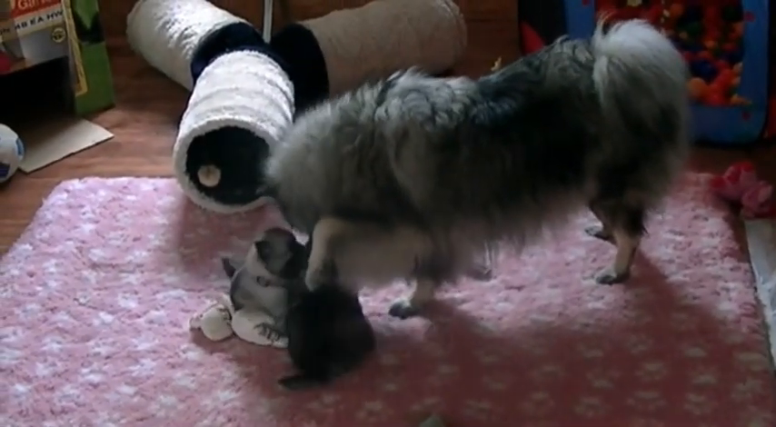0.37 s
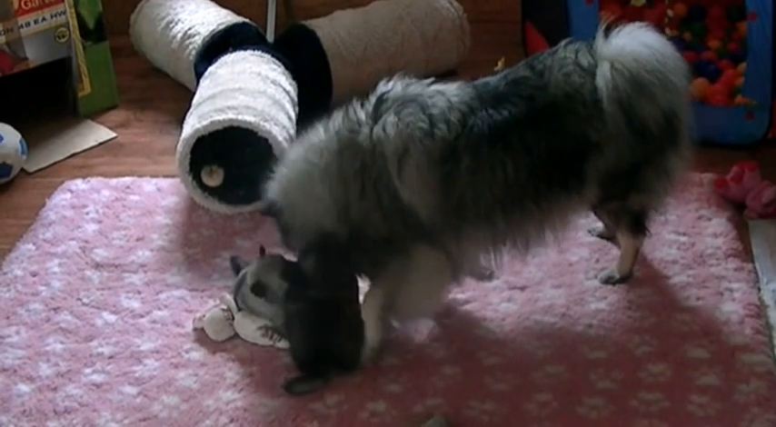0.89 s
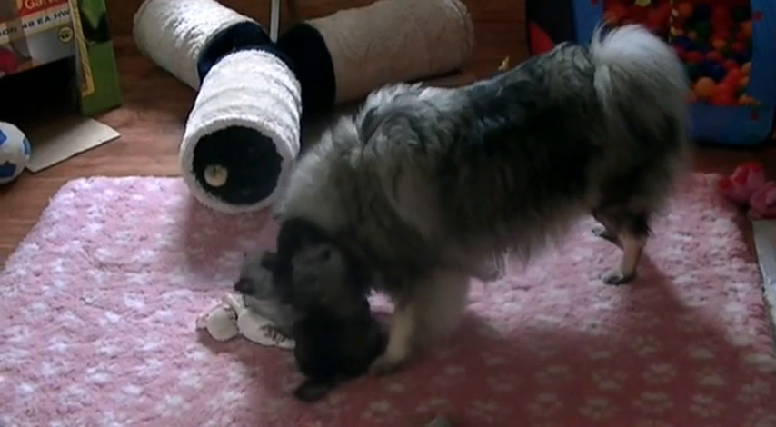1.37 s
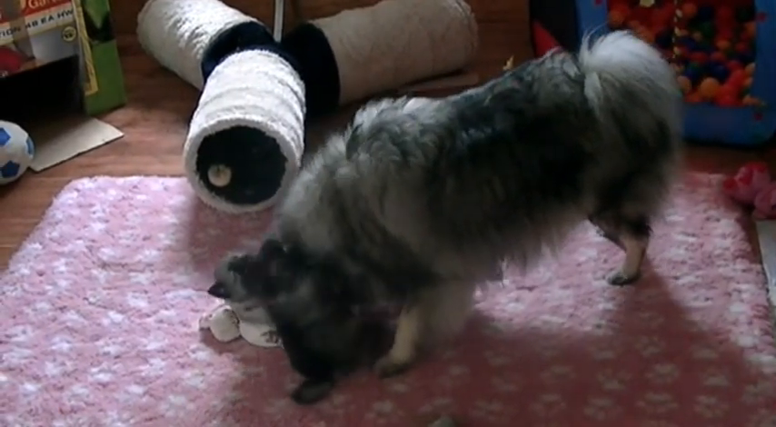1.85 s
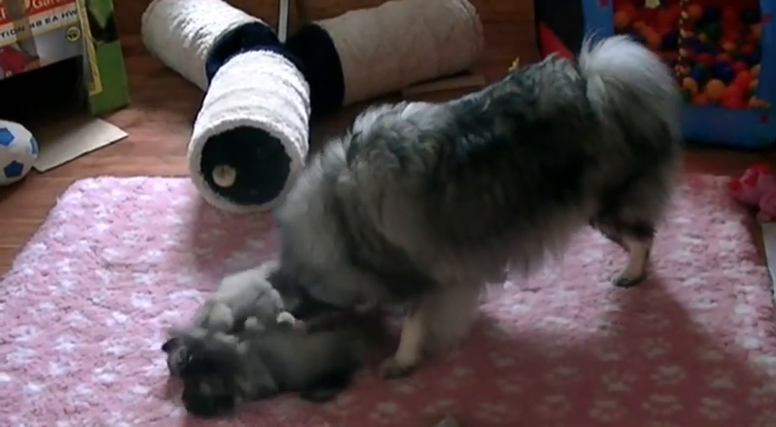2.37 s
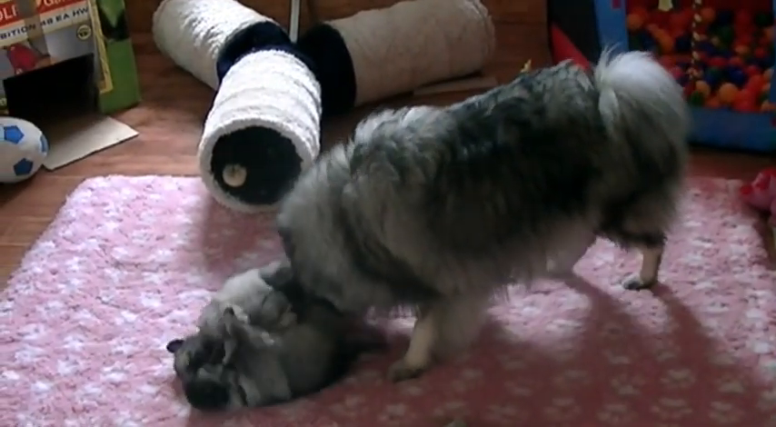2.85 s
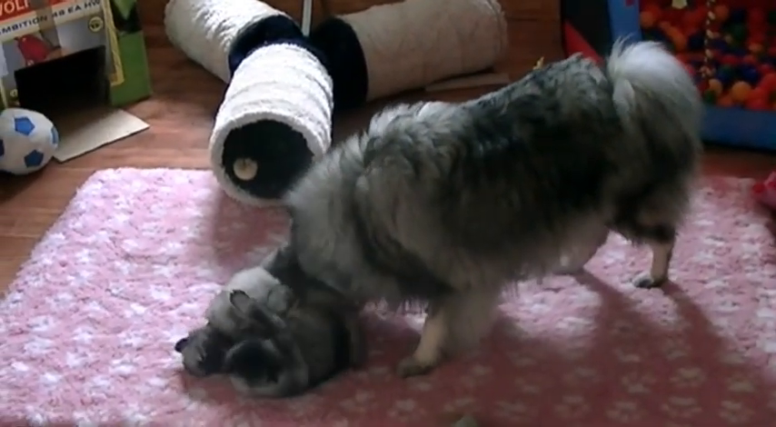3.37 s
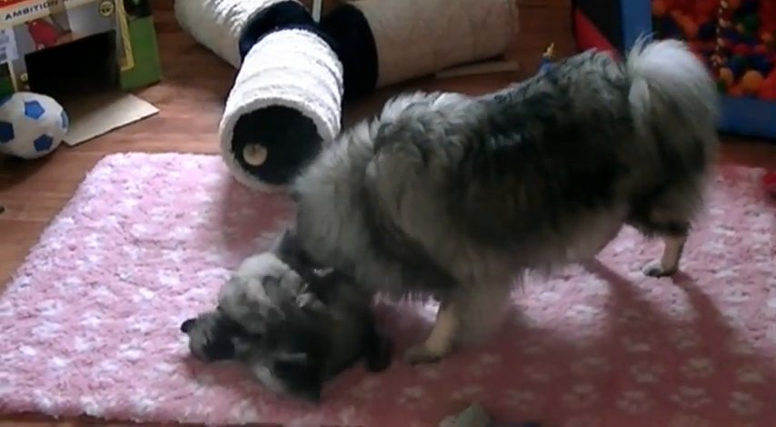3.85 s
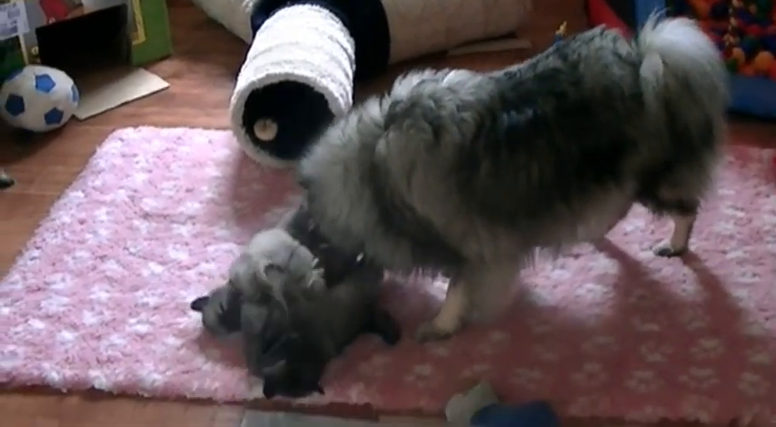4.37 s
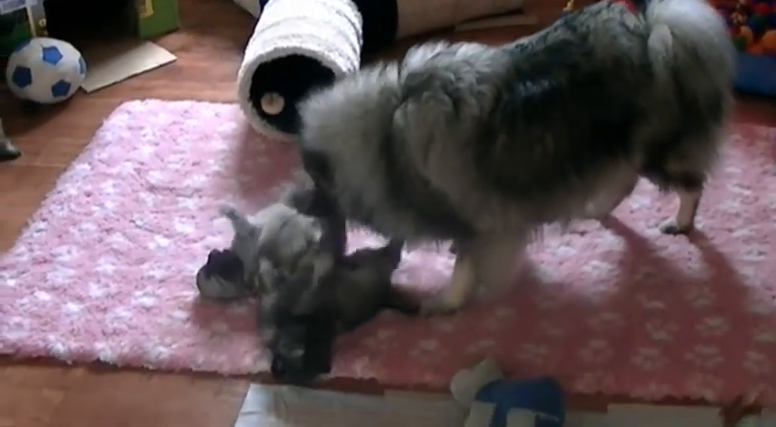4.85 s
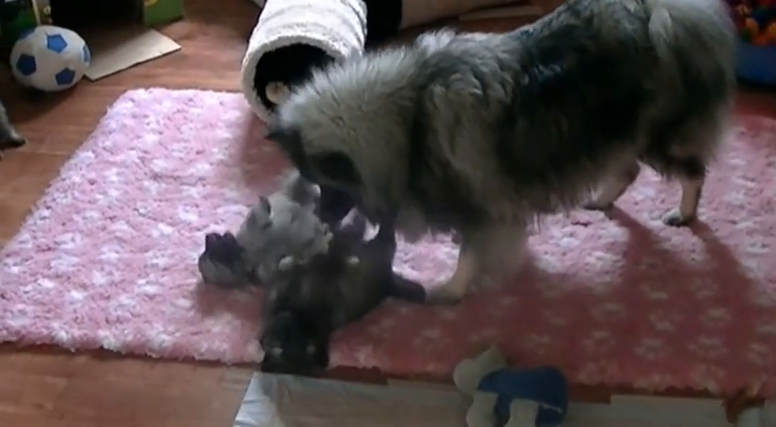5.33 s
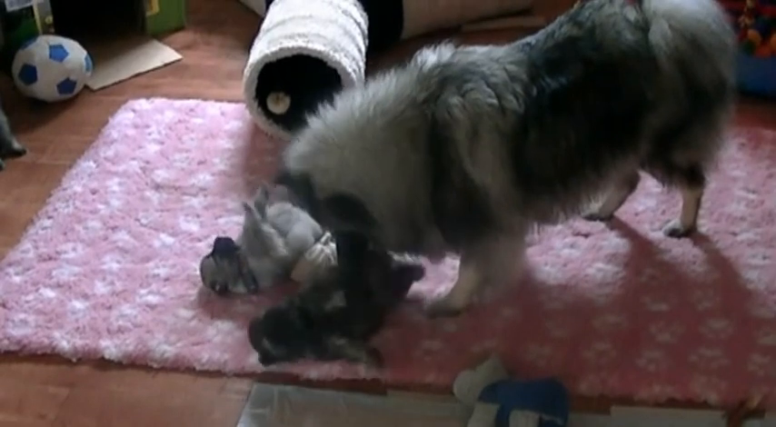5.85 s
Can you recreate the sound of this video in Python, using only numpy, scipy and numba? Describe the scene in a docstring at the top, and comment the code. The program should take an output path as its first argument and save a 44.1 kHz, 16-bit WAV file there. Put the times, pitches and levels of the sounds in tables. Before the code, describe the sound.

Puppies wrestle on a blanket in a lightly echoing living room. Tiny hoarse whimpers and whines come irregularly over soft hiss, low rumble, fur rustle, claw ticks and paw scuffs. A bigger dog grunts briefly and quietly. After about four seconds, five loud shrill squeals follow one another, each rising and falling, the second the most piercing. One microphone in the room, mono; the background dips after loud cries.

```python
"""Puppies wrestling on a blanket

In a living room, puppies give soft whimpers and whines, then five loud squeals; a bigger dog grunts.
Each cry stacks overtones on a gliding pitch, adds breath noise, and rings on in the room.
Shaped noise makes the hiss, rumble, rustling fur, ticking claws and scuffing paws; bumps are fading swings.
A limiter holds the peaks, and a gain control turns loud moments down and lets the level creep back."""
import sys
import numpy as np
from scipy import signal
from scipy.fft import rfft, irfft, next_fast_len
from scipy.io import wavfile
from scipy.ndimage import uniform_filter1d, minimum_filter1d, map_coordinates
from numba import njit

SR = 44100
rng = np.random.default_rng(int(sys.argv[2]) if len(sys.argv) > 2 else 0)


def volts_from_decibels(level):
    """Turn decibel levels (scalar or array-like) into linear amplitude factors."""
    exponent = np.asarray(level, float) / 20
    return 10 ** exponent


def output_pcm(signal):
    """Save a mono or channel-first signal as 16-bit PCM at the path in sys.argv[1].

    Samples are clipped to [-1, 1] before scaling.
    """
    pcm = np.clip(np.atleast_2d(signal).T, -1, 1) * 32767
    wavfile.write(sys.argv[1], SR, np.round(pcm).astype(np.int16))


N = 263277  # length of the scene in samples

# Tone colour of rubbing fur, also of the burst that opens a cry: (frequency [Hz], relative level [dB])
RUSTLE_COLOUR = [(300, -35), (1500, 13), (5000, -2.5), (10000, -5.5), (16000, -24)]


def unit(x):
    """Scales a sound to rms 1."""
    return x / np.sqrt(np.mean(x ** 2) + 1e-20)


def along(points, hz):
    """Reads a (frequency [Hz], value) table, with straight lines on a log frequency axis."""
    f, v = np.transpose(points)
    return np.interp(np.log(hz + 1), np.log(f + 1), v)


def noise(spectrum, size):
    """Noise of rms 1, coloured by filtering white noise with the spectrum."""
    m = next_fast_len(size + 2048)
    colour = volts_from_decibels(along(spectrum, np.fft.rfftfreq(m, 1 / SR)))
    white = rng.standard_normal(m)
    return unit(irfft(rfft(white) * colour, m)[:size])


def wobble(rate, size):
    """A smooth random curve through a given rate of random points a second."""
    points = rng.standard_normal(int(size * rate / SR) + 4)
    return map_coordinates(points, [np.arange(size) * rate / SR])


def room(x, wet_db):
    """Adds to the direct sound a fresh random tail of echoes; each frequency dies at its own speed."""
    # How long the room rings: (frequency [Hz], time to fall by 60 dB [s])
    ring_times = [(300, 0.52), (1300, 0.54), (3500, 0.36), (8000, 0.37), (14000, 0.059)]
    hz, t, z = signal.stft(rng.standard_normal(SR * 3 // 4), SR, nperseg=256)
    fading = z * volts_from_decibels(-60 * t / along(ring_times, hz)[:, None])
    tail = signal.istft(fading, SR, nperseg=256)[1]
    tail *= 1 - np.exp(-np.arange(len(tail)) / (0.00043 * SR))  # the echoes take a moment to gather
    tail *= volts_from_decibels(wet_db) / np.linalg.norm(tail)
    tail[0] = 1  # the direct sound
    return signal.fftconvolve(x, tail)


def add(track, s, sound):
    """Mixes a sound into the track at a time in seconds."""
    part = track[round(s * SR):][:len(sound)]
    part += sound[:len(part)]


def hiss():
    """Steady coloured noise whose level wavers slowly."""
    # Tone colour of the hiss: (frequency [Hz], relative level [dB])
    hiss_colour = [(15, -56), (25, -37), (148, -6.5), (423, -3.5), (585, -8), (950, -7), (1350, -11.5),
                   (2080, -14), (4180, -17.5), (4790, -17), (15700, -26.5)]
    return volts_from_decibels(-52.5 + 0.97 * wobble(5.34, N)) * noise(hiss_colour, N)


def rumble():
    """Lumpy low noise that grows stronger or weaker during some bouts."""
    # Tone colour of the rumble: (frequency [Hz], relative level [dB])
    rumble_colour = [(20, -23), (45, -35), (70, -5.5), (130, -7.5), (300, -9), (600, -25), (1000, -69)]
    # When the rumble changes: (start [s], length [s], level change [dB])
    bouts = [(2.297, .5, 5), (3.2, .95, 7), (4.498, 1, -1), (5.25, 0.89, 9.5)]
    calm_db, swell_s = -67, 0.053
    t = np.arange(N) / SR
    rumble_db = np.full(N, float(calm_db))
    for s, length, change_db in bouts:
        to_edge = np.minimum(t - s, s + length - t)
        rumble_db += change_db * np.clip(to_edge / swell_s, 0, 1)
    return volts_from_decibels(rumble_db + 4.1 * wobble(25, N)) * noise(rumble_colour, N)


def fur_rustle():
    """Fur rubbing on the blanket: noise that follows a drawn level, wavering a little."""
    # Strength of the rubbing: (time [s], level [dB])
    rubbing = [(0, -98), (1.2, -60), (2.0, -56), (2.6, -65.5), (4.2, -61)]
    level_db = np.interp(np.arange(N) / SR, *np.transpose(rubbing))
    return volts_from_decibels(level_db + 0.38 * wobble(30, N)) * noise(RUSTLE_COLOUR, N)


def paw_scuffs():
    """Paws and fur scuffing the blanket: short uneven swells of noise around one frequency."""
    # Scuffs: (start [s], level [dB], length [s], brightness [Hz])
    scuffs = [(1.254, -54, 0.21, 5530), (2.265, -52.5, 0.064, 2700), (3.487, -58.5, 0.07, 1450),
              (3.993, -53.5, 0.062, 880), (4.317, -56.5, 0.048, 5030)]
    out = np.zeros(N)
    for s, db, length, hz in scuffs:
        size = round(length * SR)
        band = [(hz / 5, -40), (hz / 1.5, 0), (hz * 1.5, 0), (hz * 5, -40)]
        swell = volts_from_decibels(db + 1.6 * wobble(93, size)) * np.hanning(size) ** 0.28
        add(out, s, swell * noise(band, size))
    return out


def thumps():
    """Dull thumps: one quick push, then a slower and slower rebound that fades."""
    # Bumps: (time [s], level before the onset and fade [dB])
    bumps = [(3.2146, -30), (4.414, -31), (5.293, -30.5)]
    out, t = np.zeros(N), np.arange(SR // 20) / SR
    for s, db in bumps:
        swing = np.sin(2 * np.pi * np.sqrt(t / 0.0084))  # the root stretches each later swing
        fade = volts_from_decibels(-60 * t / 0.014)
        onset = 1 - np.exp(-t / 0.00021)
        add(out, s, volts_from_decibels(db) * swing * fade * onset)
    return out


def claw_ticks():
    """Claws tick: a bright crack of noise that dies in milliseconds, with echoes."""
    # Ticks: (time [s], strength relative to each other [dB])
    ticks = [(1.85, -29), (1.9974, -21.5), (2.6973, -35), (3.7368, -32), (4.305, -30), (4.323, -36),
             (4.332, -31), (4.42, -30.5)]
    # Tone colour of a claw: (frequency [Hz], relative level [dB])
    claw_colour = [(1500, -30), (5000, -7), (10000, -1), (13500, -15), (16000, -28)]
    out, t = np.zeros(N), np.arange(SR // 20) / SR
    for s, db in ticks:
        crack = noise(claw_colour, len(t)) * volts_from_decibels(-60 * t / 0.0064)
        add(out, s, room(volts_from_decibels(db - 11.0) * crack, wet_db=-6))
    return out


def coloured(rows, octave_db, sinks=0.53):
    """Adds the octave's level: it opens with the mouth and lags behind the swell of the fundamental."""
    s, hz, db, mouth_db = np.transpose(rows)
    # sinks: dB of octave lost per dB of effort gained
    octave = octave_db + 0.45 * mouth_db - sinks * (db - db.max())
    return np.transpose([s, hz, db, octave, mouth_db])


def short(s, length, first_hz, last_hz, db, mouth_db):
    """A short cry: swells, fades, glides to its last pitch; the mouth narrows at the peak."""
    share = np.linspace(0, 1, num=21)  # share of the cry's length
    fall = np.interp(share, [0, 0.65, 1], [-9.5, 0, -28.5])  # dB under the peak
    hz = first_hz + (last_hz - first_hz) * np.clip(share / 0.33, 0, 1)
    return np.transpose([s + length * share, hz, db + fall, mouth_db - 0.77 * fall])


def cry(rows, jitter, breath_db, shrill_db=0):
    """Vocal folds at a gliding pitch: overtones coloured by the throat, and air leaking past."""
    # Throat colour, from the third harmonic up: (frequency [Hz], relative level [dB])
    throat = [(2000, 10.5), (3300, -13), (4000, -10.5), (4700, -6), (5500, -3), (6300, -16), (7000, -29.5),
              (8000, -22), (10500, -43.5), (12800, -50.5), (15000, -48.5)]
    # Tone colour of the leaking air: (frequency [Hz], relative level [dB])
    breath_colour = [(700, -16.5), (2000, -3.5), (3500, -18), (4600, -9.5), (5600, 3), (6800, -12),
                     (9000, -8.5), (16000, -62)]
    s, *cols = np.transpose(rows)
    t = np.arange(s[0], s[-1], 1 / SR)
    curves = [uniform_filter1d(np.interp(t, s, c), 350, mode="nearest") for c in cols]
    hz, db, octave_db, upper_db = curves
    unsteady_hz = hz * (1 + jitter * wobble(298.6, len(t)))  # smears the high overtones most
    phase = 2 * np.pi * np.cumsum(unsteady_hz) / SR
    octave = volts_from_decibels(octave_db + 3 * wobble(45, len(t))) * np.sin(2 * phase + 1)
    voice = np.sin(phase) + octave
    for k in range(3, 12):
        shimmer = 0.8 * min(k, 5) * wobble(50, len(t))
        level_db = upper_db + along(throat, k * hz) + shimmer + shrill_db * (k >= 4)
        voice += volts_from_decibels(level_db) * np.sin(k * phase + k * k)
    air_db = breath_db + 0.29 * (upper_db - upper_db.max())
    air = volts_from_decibels(air_db) * noise(breath_colour, len(t)) * (1 + np.cos(phase))  # a puff each cycle
    pop_db = db.max() + breath_db + 5.0 - 60 * (t - s[0]) / 0.037
    pop = volts_from_decibels(pop_db) * noise(RUSTLE_COLOUR, len(t))  # the folds burst open
    edges = np.clip(np.minimum((t - s[0]) / 0.0038, (s[-1] - t) / 0.0022), 0, 1)
    return edges * (volts_from_decibels(db) * (voice + air) + pop)


def soft_cry(rows, hoarse):
    """A soft cry with its own echoes; hoarse folds shake more and leak more air."""
    voice = cry(rows, jitter=0.03 * hoarse ** 1.5, breath_db=-26.5 + 8.4 * hoarse)
    return room(voice, wet_db=-4.0)


def big_dog_grunts():
    """A bigger dog's folds swing slowly and unsteadily, giving short low cries."""
    # Grunts: (start [s], length [s], first pitch [Hz], last pitch [Hz], peak of the fundamental [dB])
    grunts = [(3.544, 0.028, 397, 372, -43), (3.746, 0.053, 380, 355, -47),
              (5.795, 0.087, 350, 316.6, -33.5)]
    out = np.zeros(N)
    for row in grunts:
        rows = coloured(short(*row, mouth_db=-30.5), octave_db=-3.5)
        add(out, row[0], room(cry(rows, jitter=0.037, breath_db=-42), wet_db=-12.5))
    return out


def whimpers():
    """Puppies' short cries: a quick swell and fade while the pitch glides."""
    # Whimpers: (start [s], length [s], first pitch [Hz], last pitch [Hz], peak of the fundamental [dB])
    calls = [(.068, 0.022, 920, 875, -36.5), (0.266, 0.041, 922, 985.6, -26.5),
             (0.879, 0.058, 1190, 868, -31.5), (1.072, 0.027, 897, 792, -28.5),
             (1.295, 0.051, 1140, 1026, -37.5), (2.71, 0.034, 713, 699.4, -24.5),
             (3.011, 0.035, 749, 686, -29), (3.228, 0.032, 732, 703, -30), (3.545, 0.022, 750, 676, -43.5),
             (3.751, 0.038, 984, 1046, -31), (4.64, 0.046, 790, 823, -42), (4.885, 0.031, 840, 804, -41)]
    # The voice of each: (octave before mouth and effort act [dB], hoarseness [0-1])
    voices = [(-9, 0.4), (0, 0.47), (2, .9), (2, 1), (6, 0.74), (-14, 0.95), (-1, 1), (-3, 0.6), (2, .7),
              (3, 1), (5, 0.4), (2, .3)]
    out = np.zeros(N)
    for row, (octave_db, hoarse) in zip(calls, voices):
        rows = coloured(short(*row, mouth_db=-36), octave_db)
        add(out, row[0], soft_cry(rows, hoarse))
    return out


def whines():
    """Puppies' longer soft cries, whose pitch, effort and mouth follow drawn curves."""
    # Whines, one table a cry: (time [s], pitch [Hz], effort [dB], mouth opening [dB])
    calls = [
        [(.617,869,-33,-23),(.633,862,-37.5,-26),(.649,1002,-26,-18),(.662,1035,-44,-5),(.68,990,-50,-18)],
        [(1.61,1245,-37.5,-16),(1.646,1356,-46,3),(1.69,1272,-31,-10.5),(1.735,1160,-58,-1)],
        [(1.868,1080,-48,-3),(1.908,1187,-42.5,9.5),(1.945,1164,-36.5,6),(1.962,1087,-31,-1.5),(1.978,960,-39.5,-29),(1.995,915,-44,-26)],
        [(2.135,679,-50,-5),(2.16,707,-32.5,-12),(2.19,792,-31,-16),(2.22,783,-38.5,-20)],
        [(2.385,802,-41,-36),(2.41,818,-34.5,-22),(2.465,821,-29.5,-39),(2.478,793,-32.5,-52),(2.49,721,-28,-40),(2.521,636,-35,-40),(2.56,646,-43,-48)],
        [(4.1,1176,-51,0),(4.128,1174,-45.5,-0.5),(4.15,1369,-40,-16),(4.19,1410,-49,-10)],
        [(4.602,2826,-41,-30),(4.616,2050,-48.5,-41),(4.644,2450,-32.5,-35),(4.685,2670,-28,-25)],
    ]
    # The voice of each: (octave before mouth and effort act [dB], hoarseness [0-1])
    voices = [(-5, 0.45), (-19.5, 0.52), (0, 0.5), (-3.5, 0.92), (5, 1), (-12.5, 0.44), (-25, 0.3)]
    out = np.zeros(N)
    for rows, (octave_db, hoarse) in zip(calls, voices):
        add(out, rows[0][0], soft_cry(coloured(rows, octave_db), hoarse))
    return out


def squeals():
    """Five loud cries whose pitch arches up and down; each has its own spot, so its own echoes."""
    # Squeals, one table a cry: (time [s], pitch [Hz], effort [dB], mouth opening [dB])
    calls = [
        [(4.345,1362,-32.5,-8),(4.367,1437,-20.5,-9.5),(4.395,1521,-20.5,-9),(4.421,1612,-29.5,3.5),(4.44,1475,-25,-1),(4.463,1330,-30.5,-5),(4.49,1277,-41,-15),(4.51,1138,-38,-13)],
        [(4.65,1350,-30.5,17),(4.675,1480,-16.5,14),(4.7,1584,-15,4.5),(4.722,1625,2,-11.5),(4.75,1605,-3,-11.5),(4.774,1510,-12,5),(4.798,1377,-22.5,-6),(4.82,1110,-52,5)],
        [(4.98,1285,-36.5,-9),(5.01,1418,-11.5,2.5),(5.035,1557,-7.5,7),(5.056,1593,-11,3),(5.075,1549,-29.5,16),(5.11,1447,-16.5,-8.5),(5.17,1348,-21,-1.5),(5.19,1095,-36,0),(5.21,944,-30.5,-36)],
        [(5.37,1228,-44.5,2),(5.39,1335,-21,-3.5),(5.415,1445,-15.5,-3.5),(5.44,1482,-16,-1.5),(5.47,1485,-17,-5.5),(5.51,1393,-18,-28),(5.555,1349,-23,-8.5),(5.57,1160,-33.5,-12),(5.582,990,-39,-24)],
        [(5.737,1268,-40,-3),(5.777,1440,-13.5,-7.5),(5.809,1560,-17,-1),(5.845,1541,-19,-10),(5.875,1460,-20.5,-16.5),(5.903,1344,-14.5,-26),(5.915,1170,-30.5,-15),(5.927,960,-23.5,-29)],
    ]
    # The voice of each: (octave before mouth and effort act [dB],
    # boost from the fourth harmonic up [dB], octave lost per dB of effort [dB])
    voices = [(-26.5, 4, 0.8), (-17, -6.5, 0.6174), (-7.5, -4.5, 0.44), (-3, 1, 0.22), (2.5, 5, .1)]
    out = np.zeros(N)
    for rows, (octave_db, shrill_db, sinks) in zip(calls, voices):
        voice = cry(coloured(rows, octave_db, sinks), jitter=0.0036, breath_db=-28, shrill_db=shrill_db)
        add(out, rows[0][0], room(voice, wet_db=-3.0))
    return out


def scene():
    """Adds up everything in the room, as one channel."""
    background = hiss() + rumble() + fur_rustle()
    knocks = paw_scuffs() + thumps() + claw_ticks()
    dogs = big_dog_grunts() + whimpers() + whines() + squeals()
    return (background + knocks + dogs)[None]


@njit
def ducking(over_db, attack, release):
    """Gain in dB: drops fast while the level is over the top, creeps back after."""
    gain = np.zeros_like(over_db)
    for i in range(1, len(gain)):
        want = -over_db[i]
        speed = attack if want < gain[i - 1] else release
        gain[i] = gain[i - 1] + (want - gain[i - 1]) * speed
    return gain


def top_cut(x):
    """Nothing passes above the cut-off."""
    return signal.sosfilt(signal.butter(12, 15820, fs=SR, output="sos"), x)


def record(dry):
    """A limiter holds the peaks; a gain control ducks by the last moments' level; a low cut follows."""
    limit = np.minimum(1, 0.64 / (np.abs(dry[0]) + 1e-9))
    x = dry * uniform_filter1d(minimum_filter1d(limit, size=600), size=400)
    recent_power = uniform_filter1d(x[0] ** 2, size=3000, origin=1499)  # looks back only
    level_db = 10 * np.log10(np.abs(recent_power) + 1e-12)
    over_db = np.clip(5 * (level_db + 13.0), 0, 11)
    gain_db = ducking(over_db, 1 / (0.0012 * SR), 1 / (0.28 * SR))  # time constants in seconds
    low_cut = signal.butter(N=2, Wn=32, btype="high", fs=SR, output="sos")
    mix = signal.sosfilt(low_cut, x * volts_from_decibels(gain_db))
    return top_cut(mix)


dry = scene()
out = record(dry)
output_pcm(out)
```